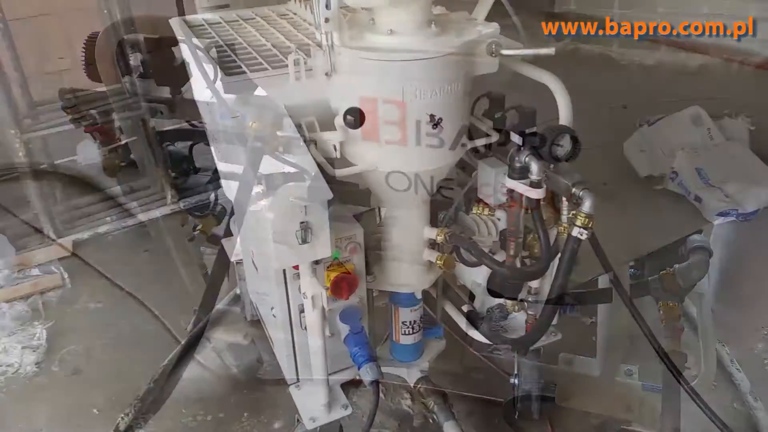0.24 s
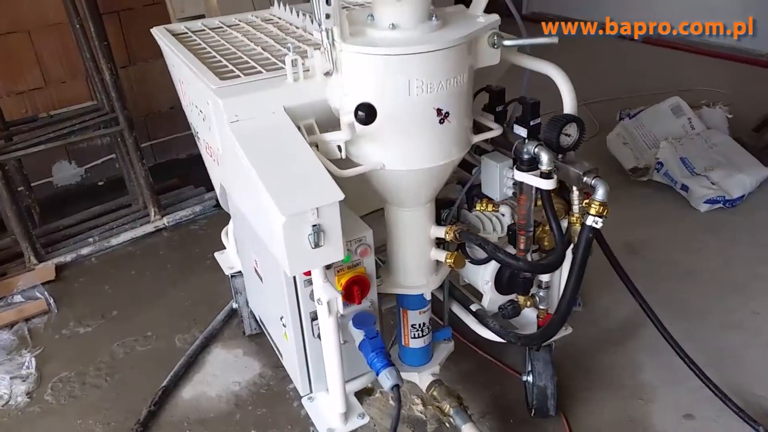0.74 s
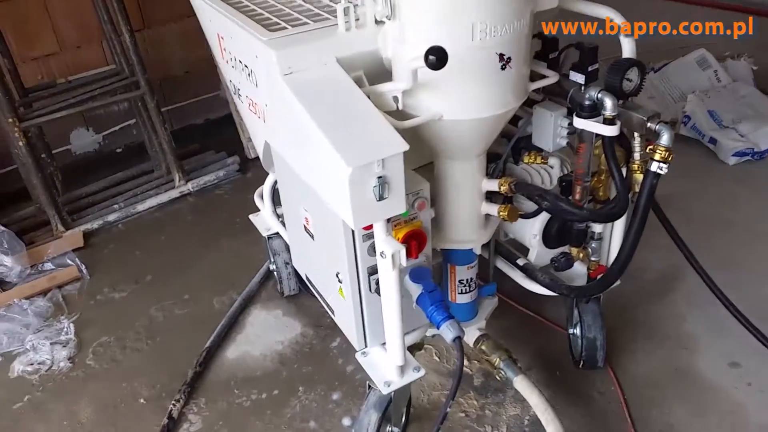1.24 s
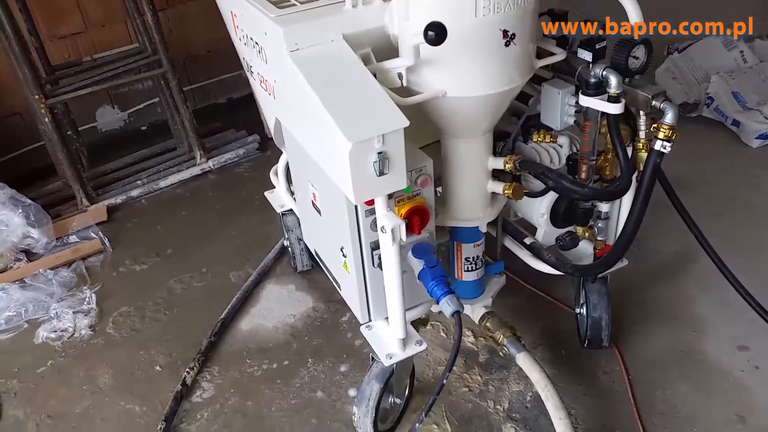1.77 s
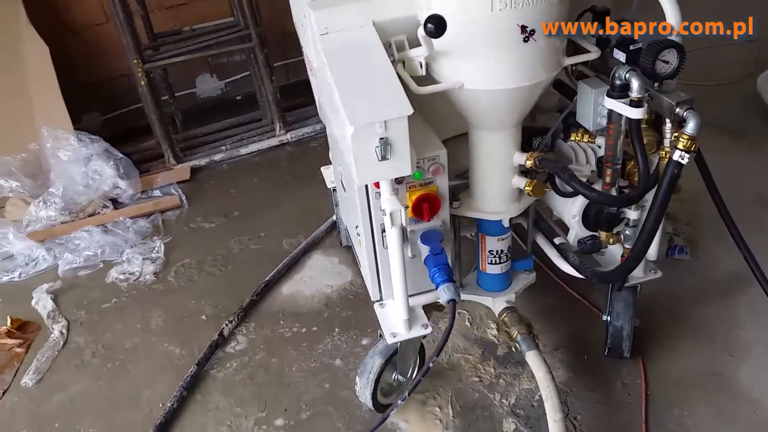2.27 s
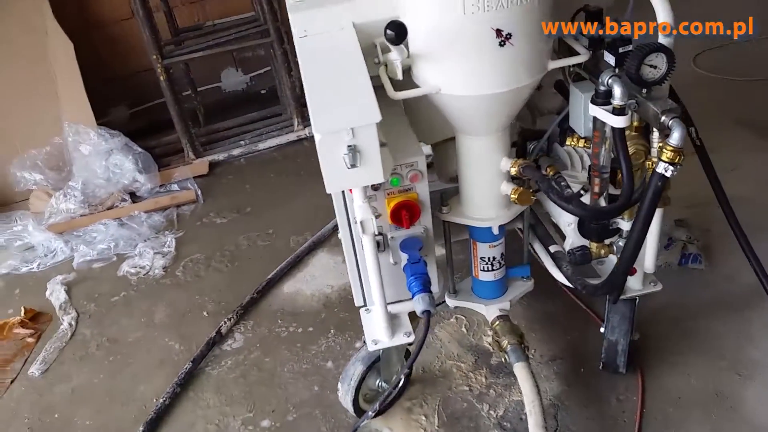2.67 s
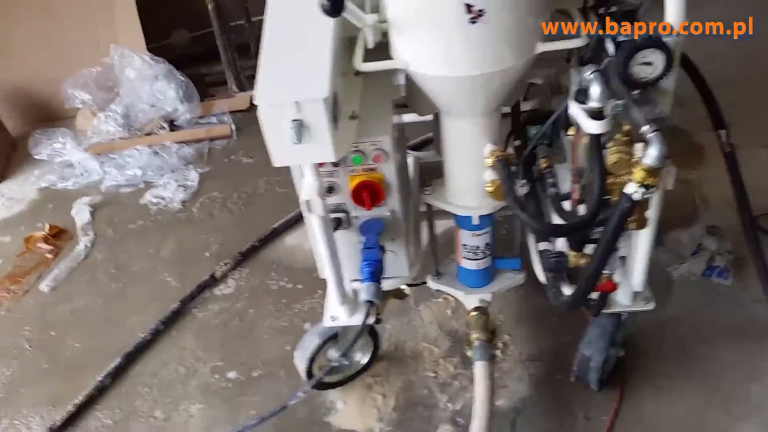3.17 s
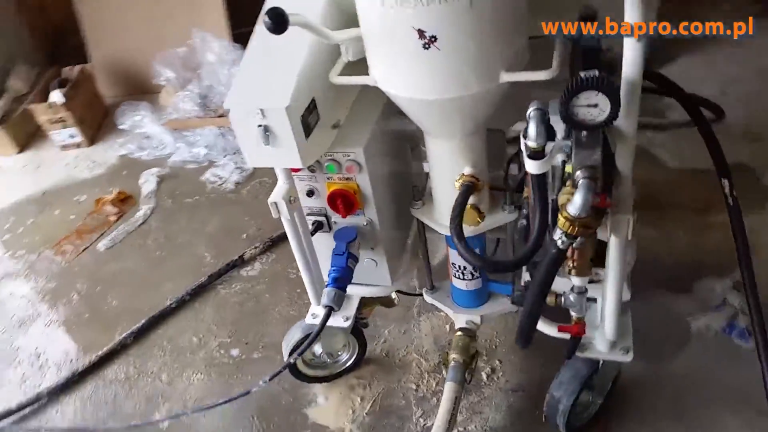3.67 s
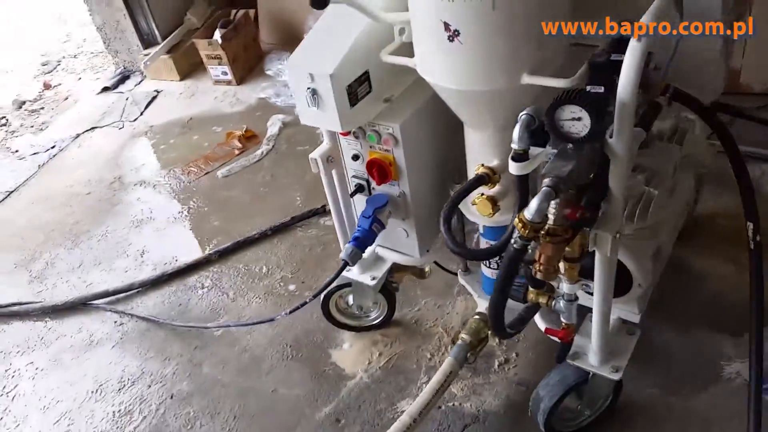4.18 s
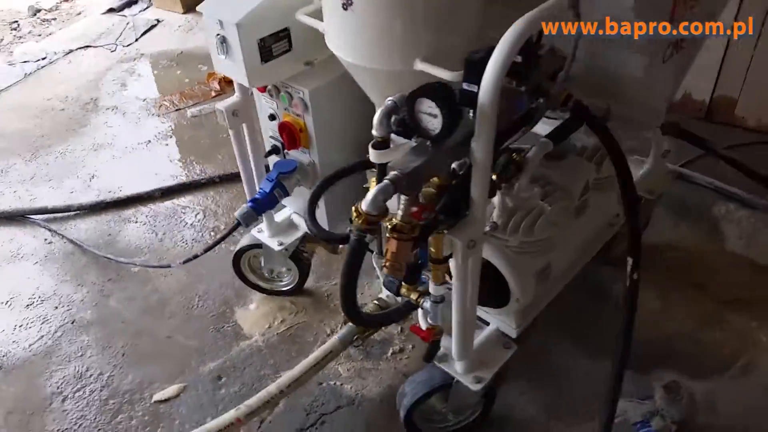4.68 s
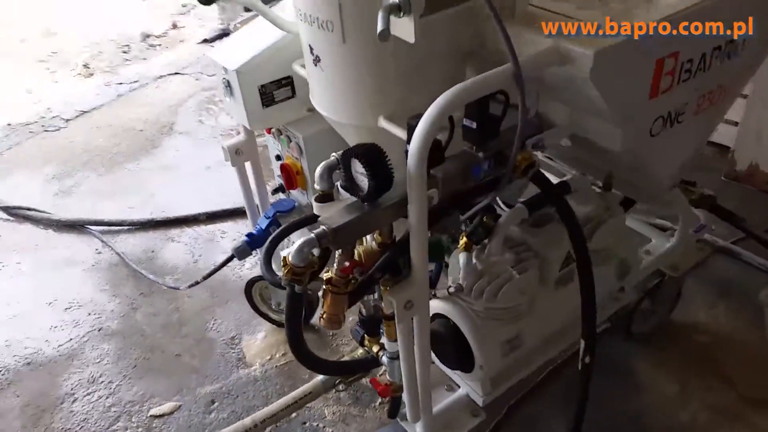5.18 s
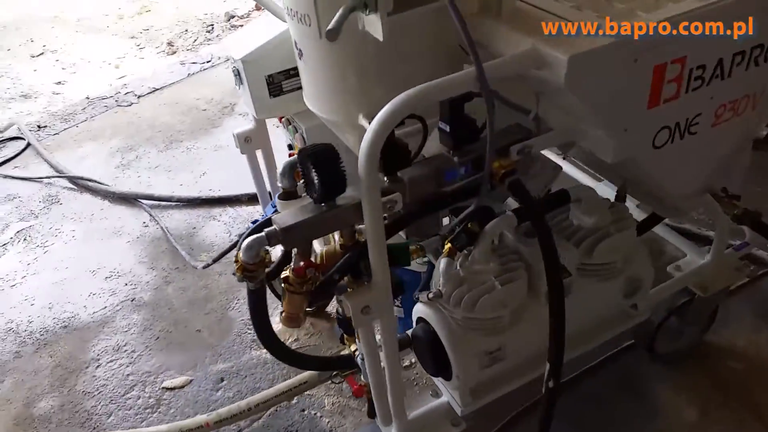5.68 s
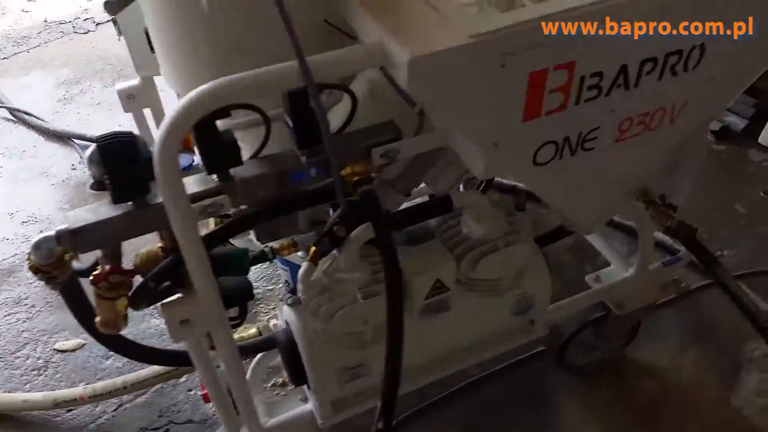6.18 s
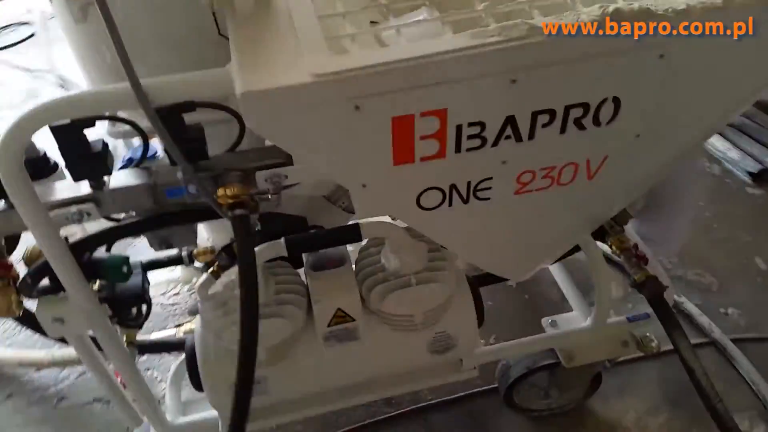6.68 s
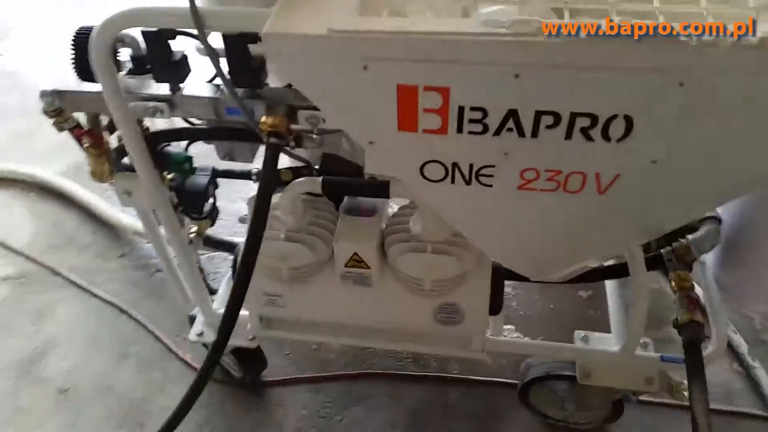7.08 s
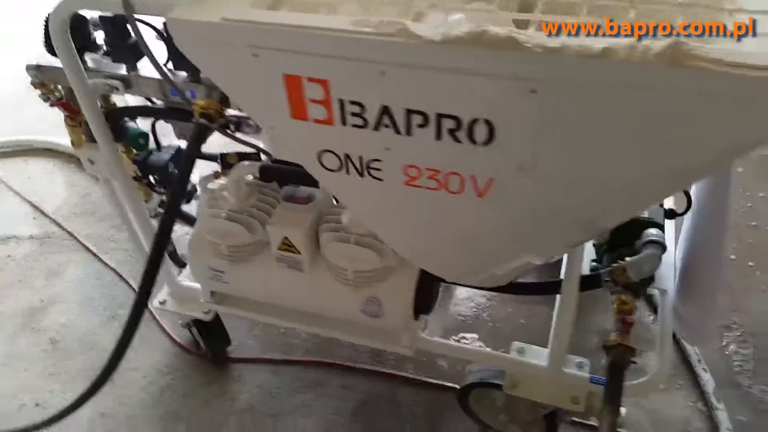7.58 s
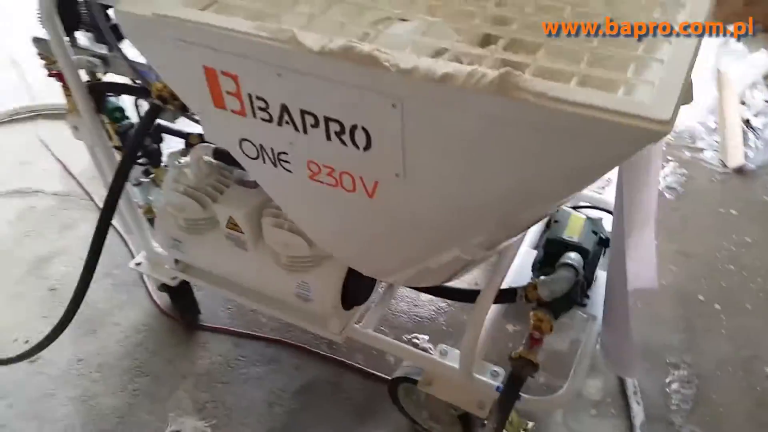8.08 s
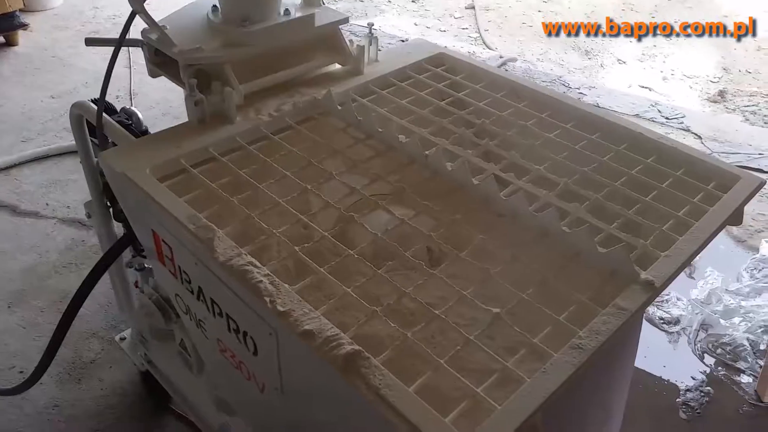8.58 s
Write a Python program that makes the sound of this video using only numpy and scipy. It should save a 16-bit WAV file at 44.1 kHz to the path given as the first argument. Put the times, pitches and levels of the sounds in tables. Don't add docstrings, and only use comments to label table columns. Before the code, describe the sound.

Close stereo in a bare concrete room, someone walking round a plastering machine. After a brief silence, a compressor throbs rapidly with clicking, puffing valves while a mixer grinds mortar and gears whine. The mixer runs down and halts around a dull knock. The compressor continues alone, its tone shifting with wall echoes, then cuts out with a sharp hiss of air. Near silence follows before both machines start again.

```python
import sys
import numpy as np
from scipy import signal
from scipy.fft import irfft, next_fast_len
from scipy.io import wavfile
from scipy.ndimage import uniform_filter1d, map_coordinates

SR = 44100
rng = np.random.default_rng(int(sys.argv[2]) if len(sys.argv) > 2 else 0)


def wrap_up_sound(samples):
    columns = np.atleast_2d(samples).T
    tamed = np.clip(columns, -1, 1)
    steps = np.round(tamed * 32767).astype(np.int16)
    wavfile.write(sys.argv[1], SR, steps)


def gain_from_decibels(decibels):
    exponent = np.asarray(decibels, float) / 20
    return 10 ** exponent


N = 389844
TIME = np.arange(N) / SR
SIZE = next_fast_len(N)
HZ = np.maximum(np.fft.rfftfreq(SIZE, 1 / SR), 1)
PAUSE_S = 7.5
STOP_S = 6.885
SHUT_S = 7.463

# time in seconds, extra path of the wall echo in metres,
# nearness to the compressor in dB, facing the high head in dB.
WALK = [(.9, 0.0, 0, -3), (2.0, 0.021, 0, 1), (2.9, 0.011, 2, 12.5), (3.14, 0.2, -4, 7),
        (3.49, 0.072, -10, 14), (3.8, 0.18, -8, 3), (4.05, 0.28, -3, 4), (4.34, 0.42, -.6, -13.5),
        (4.7, 0.58, 0.3, -2), (5.0, 0.69, -0.3, 10.5), (5.76, 0.9, 2.5, 13.5), (6.3, 1.084, 3.5, 7.5),
        (6.85, 1.14, 4, 8), (7.0, 1.5, 0, -12)]
# time in seconds, level in dB, pitch in Hz, 60 dB decay in seconds.
KNOCK = (3.0088, -1, 60, .05)


def rms_one(x):
    return x / np.sqrt(np.mean(x ** 2) + 1e-20)


def in_time(rows):
    s, *columns = np.transpose(rows)
    return [np.interp(TIME, s, c) for c in columns]


def at_hz(points, hz):
    point_hz, value = np.array(points).T
    return np.interp(np.log(hz), np.log(point_hz), value)


def drift(rate):
    knots = rng.standard_normal(int(N / SR * 40) + 3)
    coarse = TIME[::64]
    curve = map_coordinates(knots, [coarse * min(rate, 39)], order=3)
    return np.interp(TIME, coarse, rms_one(curve))


def bump(s, half, time=TIME):
    return np.exp(-((time - s) / half) ** 2)


def noise(spectrum, alike_share=0.83):
    # frequency in Hz, likeness of left and right from 0 to 1.
    likeness = [(60, 0.9), (150, 0.97), (380, 0.9), (950, 0.5), (2380, 0.09), (5980, -0.02), (15000, 0.03)]
    # frequency in Hz, left minus right in dB.
    left_lean = [(60, -6.5), (99, -1.5), (160, 9), (270, 5), (450, 4), (740, 4.5), (1220, 8), (2010, 8),
                 (3330, 2), (5500, 0.5), (9080, 12.5), (15000, -16.5)]
    mid, side = rng.standard_normal((2, len(HZ))) + 1j * rng.standard_normal((2, len(HZ)))
    alike = np.clip(alike_share * at_hz(likeness, HZ), 0, 1)
    pair = np.sqrt(1 + alike) * mid + np.sqrt(1 - alike) * side * [[1], [-1]]
    lean = gain_from_decibels(at_hz(left_lean, HZ) / 2 * np.array([[1], [-1]]))
    inside = (HZ > spectrum[0][0]) & (HZ < spectrum[-1][0])
    out = irfft(pair * lean * gain_from_decibels(at_hz(spectrum, HZ)) * inside, SIZE)[:, :N]
    return out / np.std(out.mean(axis=0))


def ring(clicks, hz, t60):
    r, w = gain_from_decibels(-60 / (t60 * SR)), 2 * np.pi * hz / SR
    return signal.lfilter([0, np.sin(w)], [1, -2 * r * np.cos(w), r * r], clicks + 1e-18)


def placed(x, lean_db, lag_s):
    right = np.roll(x, round(lag_s * SR))
    return np.array([x * gain_from_decibels(lean_db / 2), right * gain_from_decibels(-lean_db / 2)])


def even(x):
    return x / np.sqrt(uniform_filter1d(x ** 2, size=5600) + 1e-9)


def ringing(clicks, level, modes):
    body = sum(gain_from_decibels(db) * ring(clicks, hz, t60) * (-1) ** k for k, (hz, db, t60) in enumerate(modes))
    return placed(level * even(body), lean_db=5.5, lag_s=0.000089)


def swells(rows, cycles):
    out = np.zeros(N)
    for s, multiple, db, half in rows:
        near = slice(int((s - 3 * half) * SR), int((s + 3 * half) * SR))
        sine = np.sin(2 * np.pi * (round(multiple) * cycles[near] + rng.random()))
        out[near] += gain_from_decibels(db) * bump(s, half, TIME[near]) * sine
    return placed(np.sqrt(2) * out, lean_db=7.0, lag_s=0.000088)


def opening_rise():
    first_rise = (TIME - 0.038) / 0.85
    restart_rise = (TIME - 8.361) / 0.28
    return np.clip(np.where(TIME < PAUSE_S, first_rise, restart_rise), 0, 1)


def pumping():
    until_stop = np.clip((STOP_S - TIME) / .015 + 1, 0, 1)
    return opening_rise() * np.where(TIME < PAUSE_S, until_stop, 1)


def mixing():
    coast_db = 34.5 * np.maximum(TIME - 2.725, 0)
    halt_db = 150 * np.maximum(TIME - 3.33, 0)
    return np.where(TIME < PAUSE_S, gain_from_decibels(-coast_db - halt_db), 1)


def crank():
    # time in seconds, turns made.
    runs = [
        [(0.22, 0.007), (2.65, 57.809), (4.15, 93.26), (5.15, 116.79), (6.9, 157.77)],
        [(8.38, 0.068), (8.83, 10.759)],
    ]
    return np.where(TIME < PAUSE_S, *[in_time(run)[0] for run in runs])


def throb(turns, lead, smear):
    # order, level in dB, wall echo share from 0 to 1, echo phase in turns,
    # dB more under mixer load.
    strong_orders = [(4.0, -34, 0.7, 0.406, 2.5), (5.0, -44, 0.1, 1.24, 10), (6.0, -22, 1, 0.598, -2.5),
                     (7.0, -26.5, 0.82, 0.827, 2.05), (8.0, -21.5, 0.37, 0.63, -0.56),
                     (9.0, -17, 0.61, 0.909, -9), (10.0, -38.5, 0.46, 0.083, 2.6),
                     (11.0, -33, 0.96, 0.724, 4.5)]
    weak_orders = [(3, -58.24, 0.9, -0.11, -2), (12, -44.5, 0.56, 0.29, 1.76), (13, -40, 0.8, 0.64, -5.5),
                   (14, -50, 0, 0.43, 1.5), (15, -43, 0.47, 0.32, -5), (16, -53, 0.43, 0.89, -6),
                   (17, -48, 0.6, 0.15, -6.5), (18, -52.5, 0.35, -0.18, 6), (19, -56.5, 0.49, 0.88, 4.21)]
    levels = order_levels(strong_orders)
    levels[5] = levels[5] * gain_from_decibels(5.7 * mixing() * drift(3.5))
    out = np.zeros(N)
    for k, level in levels.items():
        phase = k * turns + lead * (k - 8) + smear * max(k - 8, 0) ** 2
        out += level * np.cos(2 * np.pi * phase)
    out += gain_from_decibels(-22) * levels[4] ** .6 * pumping() * np.cos(2 * np.pi * 2 * turns)
    for k, level in order_levels(weak_orders).items():
        out += level * gain_from_decibels(2.5 * drift(2.0)) * np.cos(2 * np.pi * (k * turns + rng.random()))
    return placed(np.sqrt(2) * out, lean_db=2.5, lag_s=.00017)


def order_levels(table):
    crank_hz, follows_nearness = 23.53, 0.68
    step = slice(None, None, 64)
    echo_m, near_db, _ = [c[step] for c in in_time(WALK)]
    load = mixing()[step]
    sag = np.clip((TIME - STOP_S) / .14 + 1, 0, 1) * (TIME < PAUSE_S)
    common = pumping() * gain_from_decibels(-10 * sag ** 2)
    levels = {}
    for order, db, share, phase, load_db in table:
        k = round(order)
        echo_turns = k * crank_hz * echo_m / 343 + phase
        echo = np.sqrt(1 + share ** 2 + 2 * share * np.cos(2 * np.pi * echo_turns))
        level = gain_from_decibels(db + follows_nearness * near_db + load_db * load) * echo
        levels[k] = common * np.interp(TIME, TIME[step], level)
    return levels


def valves(turns, lag, between_db):
    # place in the turn from 0 to 1, level in dB, 1 for an in-between valve.
    snaps = [
        (.03, 0.0, 0),
        (.3, -3.0, 1),
        (.55, -4.0, 0),
        (.86, -6.0, 1),
    ]
    # frequency in Hz, level in dB, 60 dB decay in seconds.
    low_head = [(682, 0, .11), (712, -1, .1), (745, -4, .08), (782, 0, .1), (855, -2, .07)]
    high_head = [(925, -5, .07), (985, 0, .13), (1033, -2, .1), (1078, -4, .1), (1310, -6, .06)]
    air_pipe = [(1668, 0, .08), (1310, -14, .05)]
    # frequency in Hz, dB per Hz.
    puff_color = [(5500, -35.5), (7500, -30), (8500, -21.5), (10000, -20.5), (11000, -12), (11600, -7.5),
                  (13000, -0.5), (14000, -6), (15400, -7), (16000, -6)]
    # frequency in Hz, dB per Hz.
    flow_color = [(180, -33), (300, -10), (540, -19.5), (698, -12), (1030, -13), (1160, -17), (1700, -22),
                  (1800, -22), (2510, -21), (3100, -29.5), (4450, -17.5), (5670, -34.5), (8260, -30.5),
                  (9900, -35.5), (11000, -35.5), (14300, -66), (22000, -120)]
    # time in seconds, order, level in dB,
    # half length in seconds.
    head_swells = [(4.05, 33, -35, .25), (4.4, 29, -37, .2), (4.72, 30, -31.5, .22), (4.7, 32, -38, .2),
                   (5.8, 29, -35, .5), (5.6, 42, -31, .6), (6.55, 42, -34, .45), (4.85, 44, -39, .2),
                   (6.5, 44, -35, .45), (6.45, 46, -39, .45), (4.2, 38, -44, .3), (5.4, 37, -37, .25),
                   (6.6, 35, -40, .3), (6.2, 40, -40, .4)]

    puffs_level, flow, low, high, pipe = air_levels()
    steady = .14 + 0.75 * mixing()
    clicks, puffs = np.zeros(N), np.zeros(N)
    for turn, db, between in snaps:
        beat = np.floor(turns - lag - turn)
        at = np.flatnonzero(np.diff(beat) > 0)
        luck = rng.standard_normal((200, 3))[:len(at)]
        size = gain_from_decibels(db + between * between_db[at])
        clicks[at] += size * gain_from_decibels(.7 * luck[:, 0])
        late = (.0006 * SR * abs(luck[:, 2])).astype(int)
        puffs[np.minimum(at + late, N - 1)] += size * gain_from_decibels(2.0 * luck[:, 1])
    fall, rise = np.exp(-1 / (.004 * SR)), np.exp(-1 / (.0005 * SR))
    gate = signal.lfilter([1 - rise], np.convolve([1, -fall], [1, -rise]), puffs + 1e-18)
    out = puffs_level * noise(puff_color) * even(steady + gate)
    out += flow * gain_from_decibels(2.0) * noise(flow_color) * even(0.47 + steady + gate)
    contacts = rattle(turns)
    out += placed(np.sqrt(low * high) * gain_from_decibels(-7.5) * contacts, lean_db=4.5, lag_s=0.00034)
    clicks = clicks + .06 * contacts
    out += ringing(clicks, low * gain_from_decibels(-9.0), low_head)
    out += ringing(clicks, high * gain_from_decibels(-10.5), high_head)
    out += pumping() * swells(head_swells, turns)
    out += ringing(clicks, pipe, air_pipe)
    return out


def air_levels():
    # time in seconds, level in dB,
    # half length in seconds.
    pipe_swells = [
        (3.17, -38.5, 0.16),
        (3.6, -45.5, 0.21),
        (4.28, -38.5, 0.25),
        (4.75, -42.5, 0.14),
        (5.6, -42.5, .35),
    ]
    echo_m, near_db, facing_db = in_time(WALK)
    on, load = pumping(), mixing()
    air = on * gain_from_decibels(near_db)
    puffs = np.hypot(air * gain_from_decibels(-32.5), on * load * gain_from_decibels(-27))
    low = air * gain_from_decibels(-26 - 4 * echo_m ** 2 + load * (3.0 * drift(4.1) - 6))
    high = air * gain_from_decibels(-38.5 + facing_db + load * 3.0 * drift(4.0))
    pipe = on * sum(gain_from_decibels(db) * bump(s, half) for s, db, half in pipe_swells)
    return puffs, air * gain_from_decibels(-38), low, high, pipe


def rattle(turns):
    order = np.arange(1025)
    shape = (order > 19) * (order < 105) * order ** 2 / (1 + (order / 40) ** 7)
    loops = irfft(shape * np.exp(2j * np.pi * rng.random((3, 1025))), axis=1)
    at = (turns % 1 * 2047).astype(int)
    return rms_one(sum(gain_from_decibels(3 * drift(.8)) * loop[at] for loop in loops))


def mixer():
    # frequency in Hz, dB per Hz.
    grind_color = [(160, -28.5), (280, -10), (312, -28), (381, -23), (494, -9), (550, -13), (715, -3.5),
                   (796, -9), (1690, -10), (2450, -14.5), (2940, -19.5), (3870, -17), (11000, -27.5),
                   (14300, -54), (22000, -120)]
    # frequency in Hz, dB per Hz.
    rumble_color = [(25, -8), (40, -31.5), (55, -6.5), (80, -3), (110, 0), (200, 9.5), (280, -2),
                    (400, -30)]
    # frequency in Hz, level in dB, dB more on restart.
    gear_lines = [(496, 0, 0), (714, -3, 8), (975, -7, 4), (1145, -10, 8), (1358, -8, 6), (1569, -11, 24),
                  (1690, -10, 6), (121, 1, 12), (250, -20, 32)]
    # time in seconds, frequency in Hz, level in dB,
    # half length in seconds.
    gear_swells = [
        (1.1, 1147, -34, 0.49),
        (2.55, 953, -33, .25),
        (2.55, 1554, -36, 0.34),
        (2.65, 1920, -31, 0.13),
        (2.75, 1367, -33.5, 0.26),
        (3.18, 1295, -43, 0.17),
        (3.19, 1554, -41, 0.13),
        (3.16, 1666, -42, 0.11),
    ]
    load, restarted = mixing(), TIME > 8
    grind = opening_rise() * load * gain_from_decibels(-25)
    whine = opening_rise() * load ** .45 * gain_from_decibels(-32 - 9 * restarted)
    out = grind * gain_from_decibels(1.5 + 1.0 * drift(9)) * noise(grind_color)
    out += grind * gain_from_decibels(-6.0 + 1.3 * drift(6.5)) * noise(rumble_color)
    shaft = np.cumsum(1 + .0008 * drift(4)) / SR
    for hz, db, restart_db in gear_lines:
        level = whine * gain_from_decibels(db + restart_db * restarted + 1.5 * drift(3))
        line = np.sqrt(2) * level * np.sin(2 * np.pi * hz * shaft)
        out += placed(line, lean_db=7.0, lag_s=0.000053)
    return out + swells(gear_swells, shaft)


def blow_off():
    # frequency in Hz, dB per Hz.
    hiss_color = [(1650, -28.5), (2800, -23.5), (3670, -7), (4270, -10.5), (5090, -9.5), (5600, -16.5),
                  (8300, -11.5), (11900, -9.5), (13900, -5), (14800, -8.5), (16000, -12.5)]
    # frequency in Hz, dB per Hz.
    roar_color = [(24, -36), (40, -12), (158, -2), (337, -9), (390, -6.5), (450, -11), (1280, -7),
                  (3000, -7.5), (3900, -41.5), (6600, -120)]
    # delay in seconds, level in dB, dB lost per second.
    hiss_parts = [
        (0.0, -22, 200),
        (0.0, -16.5, 42),
        (0.0, -27, 10),
    ]
    roar_parts = [
        (0.0, -23, 2200),
        (0.038, -27, 900),
        (0.002, -24.5, 76),
        (0.0031, -48, 15),
    ]
    ragged = gain_from_decibels(1.2 * drift(38))
    air = noise(hiss_color)
    dull = signal.sosfilt(signal.butter(2, 7000, fs=SR, output="sos"), air)
    bright = gain_from_decibels(-40 * np.maximum(TIME - SHUT_S, 0))
    hiss = dying(hiss_parts) * ragged * (dull + bright * (air - dull))
    roar = dying(roar_parts) * noise(roar_color, alike_share=.3)
    return hiss + roar * gain_from_decibels(np.array([[-4.0], [4.0]]))


def dying(parts):
    total = np.zeros(N)
    for delay, db, loss in parts:
        age = np.maximum(TIME - 6.896 - delay, 0)
        total += (np.minimum(age / .003, 1) * gain_from_decibels(db - loss * age)) ** 2
    return np.sqrt(total) * gain_from_decibels(-79 * np.maximum(TIME - SHUT_S, 0))


def handling():
    # time in seconds, frequency in Hz, level in dB.
    far_taps = [
        (3.5, 470, -42),
        (3.66, 470, -43),
        (4.87, 510, -38),
        (5.38, 500, -40),
        (5.74, 510, -39),
        (7.56, 410, -56),
        (8.2, 1150, -60),
    ]
    # time in seconds, level in dB, half length in seconds.
    shoe = (5.2, -27.5, 0.042)
    s, db, hz, t60 = KNOCK
    click = np.zeros(N)
    click[round(s * SR)] = gain_from_decibels(db)
    knock = ring(click, 300, .014) + 1.3 * ring(click, 1300, .0025) + 1.8 * click
    knock -= .5 * ring(click, hz, t60)
    out = signal.lfilter([.35], [1, -.65], knock)
    age = TIME[:SR // 4]
    swell = age / .025 * np.exp(1 - age / .025)
    for s, hz, db in far_taps:
        at = round(s * SR)
        out[at:at + len(age)] += gain_from_decibels(db) * swell * np.sin(2 * np.pi * hz * age)
    s, db, half = shoe
    grit = noise([(700, -8), (1100, 0), (2400, -1), (2900, -18), (6500, -24), (7500, -40)])
    return out + gain_from_decibels(db) * bump(s, half) * grit


def building_site():
    # frequency in Hz, dB per Hz.
    murmur_color = [(15, -52), (25, -20.5), (38, -19.5), (48, -19), (107, -8.5), (147, -15), (243, -12.5),
                    (403, -24), (1200, -23), (1940, -26), (2600, -41), (3380, -70.5), (5720, -120)]
    # time in seconds, level in dB.
    murmur_db = [(.22, -40), (6.8, -39.5), (7.2, -74), (7.6, -58.5), (7.9, -65), (8.15, -60), (8.25, -58),
                 (8.35, -52), (8.84, -60)]
    return gain_from_decibels(in_time(murmur_db)[0] + 2.0 * drift(4.2)) * noise(murmur_color)


def scene():
    # time in seconds, arrival lead in turns, upper-order smear in turns,
    # valve lag in turns, in-between valves in dB.
    sound_path = [(.2, -.045, -.063, .13, -12), (2.6, -.045, -.063, .13, -12), (3.3, .12, -.1, .02, -12),
                  (4.3, .12, -.08, .02, -10), (5.2, .12, -.06, 0.0, -2), (5.7, .12, .05, -.02, -2),
                  (6.0, .12, .2, -.03, -2), (6.9, .11, .33, -.03, -2), (8.3, -.13, 0.0, .1, -12)]
    turns = crank()
    lead, smear, lag, between_db = in_time(sound_path)
    compressor = throb(turns, lead, smear) + valves(turns, lag, between_db)
    return compressor + mixer() + blow_off() + handling() + building_site()


def low_pass(x):
    return signal.sosfilt(signal.butter(12, 16970, fs=SR, output="sos"), x)


def record(dry):
    duck = gain_from_decibels(-9 * bump(KNOCK[0] + .012, .008))
    wet = dry * duck * (TIME > .2165)
    wet = wet / (1 + (wet / .8) ** 6) ** (1 / 6)
    top_cut = signal.ellip(12, .3, 70, 15780, fs=SR, output="sos")
    return low_pass(signal.sosfilt(top_cut, wet))


dry = scene()
out = record(dry)
wrap_up_sound(out)
```